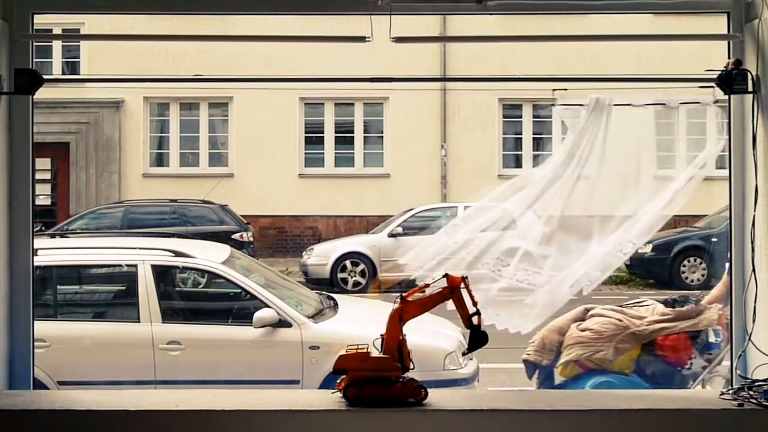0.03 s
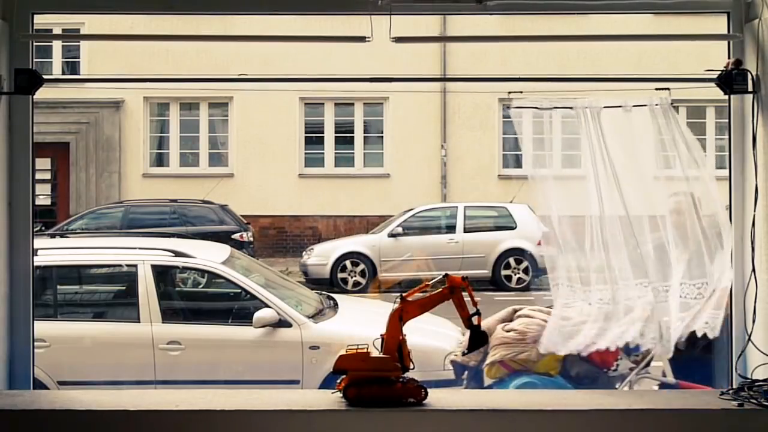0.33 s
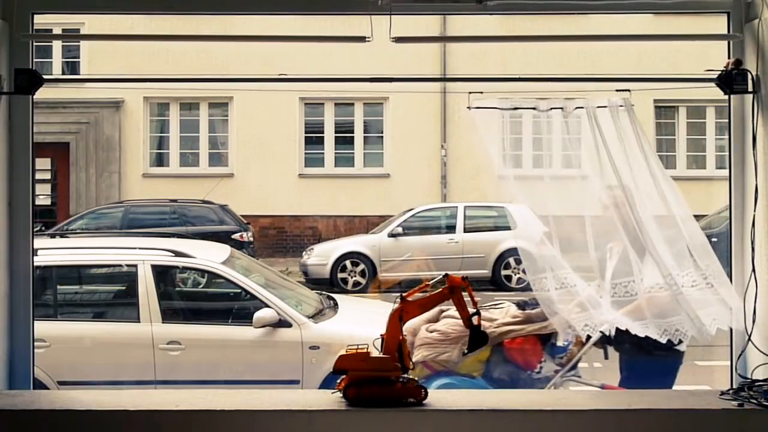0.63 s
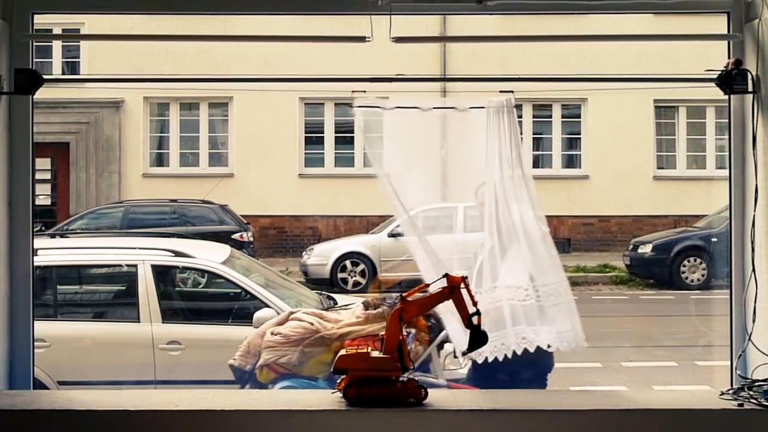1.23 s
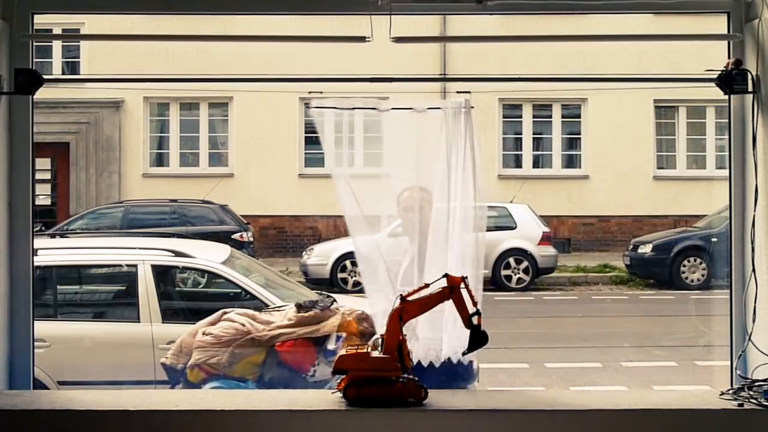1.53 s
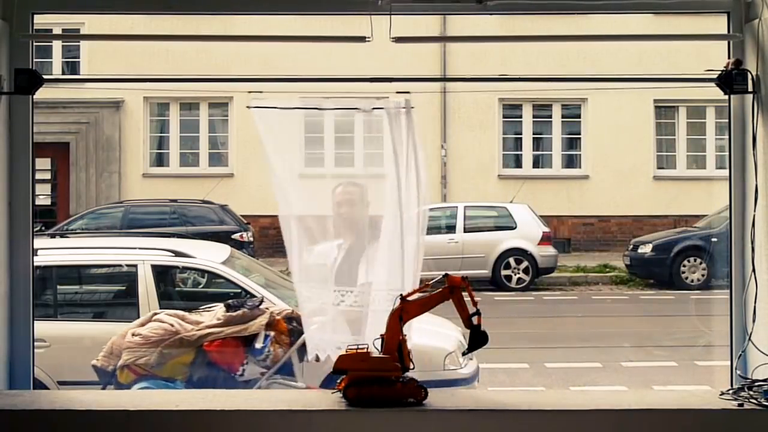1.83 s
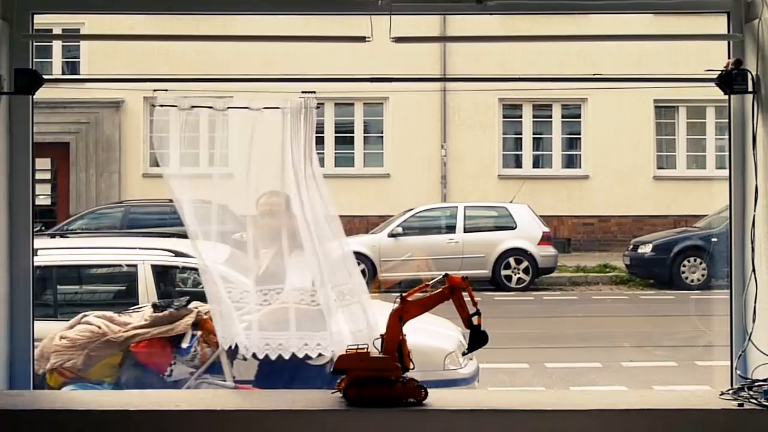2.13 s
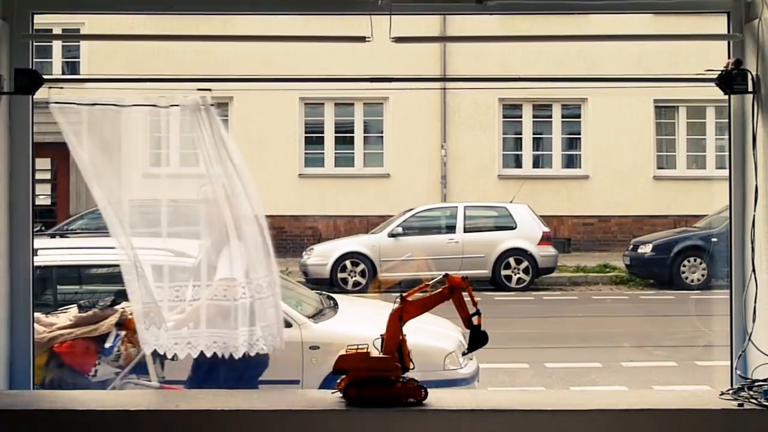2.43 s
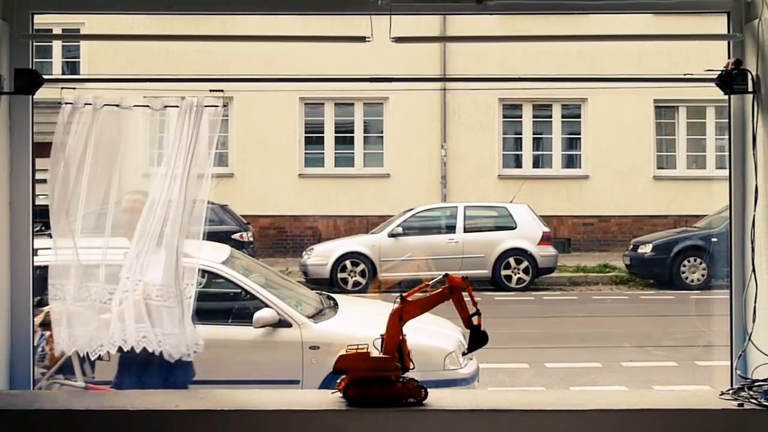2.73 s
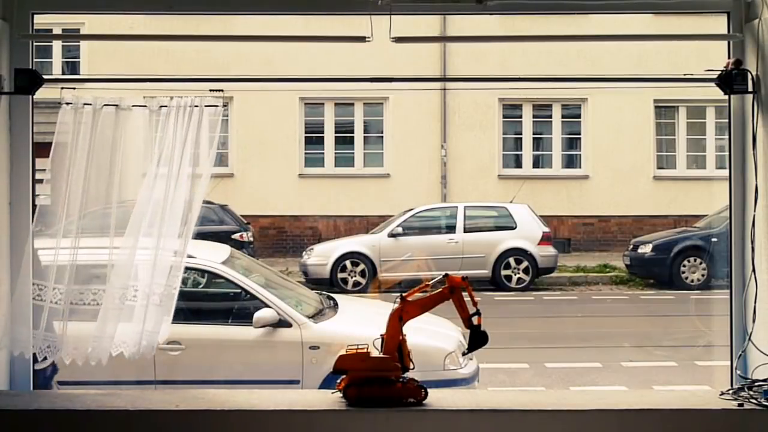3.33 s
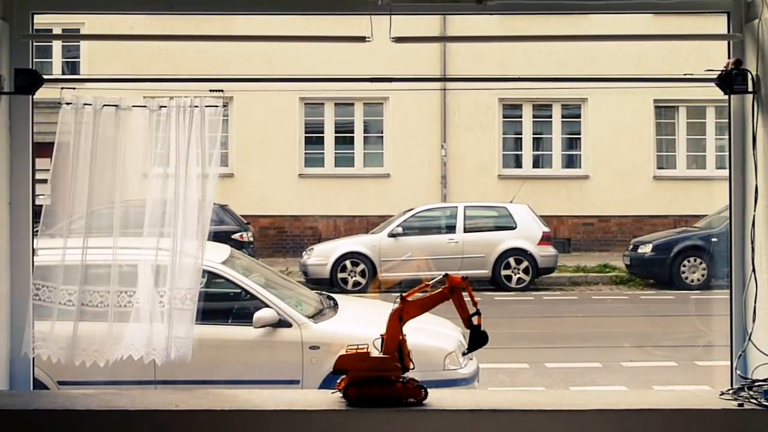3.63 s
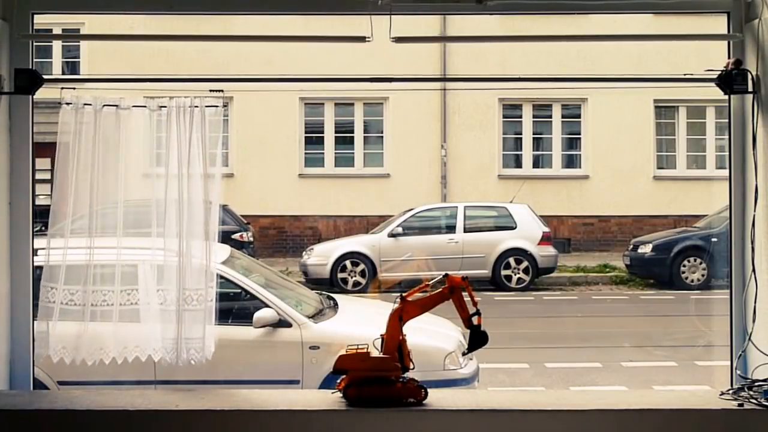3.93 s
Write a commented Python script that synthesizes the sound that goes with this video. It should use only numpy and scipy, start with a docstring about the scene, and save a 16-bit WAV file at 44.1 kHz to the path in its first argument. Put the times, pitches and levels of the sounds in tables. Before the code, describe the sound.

A small motor pulls a curtain along its line with a light, scratchy whirr. The line catches and squeaks on its pulleys, drags hardest near the end, then stops. A quiet street murmurs behind the window.

```python
"""A light, scratchy whirr: a small motor draws a curtain along its line beside a window, then stops.
The line rubs over its pulleys in countless tiny slips that ring the pulleys and their brackets;
it catches a few times, squeaks briefly and drags hardest near the end.
The room rings a little, and a quiet street murmurs behind the glass."""
import sys
import numpy as np
from scipy import signal
from scipy.fft import rfft, irfft, next_fast_len
from scipy.io import wavfile
from scipy.ndimage import map_coordinates

SR = 44100
rng = np.random.default_rng(int(sys.argv[2]) if len(sys.argv) > 2 else 0)


def log_audio(samples):
    """Write samples as a 16-bit WAV file to the path given in sys.argv[1]."""
    # one column per channel
    frames = np.atleast_2d(samples).T
    # limit to full scale, then quantise
    limited = np.clip(frames, -1, 1)
    pcm = np.round(limited * 32767).astype(np.int16)
    wavfile.write(sys.argv[1], SR, pcm)


N = 176400
TIME = np.arange(N) / SR


def from_db(db):
    """Turn decibels into a gain."""
    return 10 ** (np.asarray(db) / 20)


def unit_level(x):
    """Scale a signal so its average (rms) level is 1."""
    return x / np.sqrt(np.mean(x ** 2) + 1e-20)


def in_time(rows):
    """Join (time, value) rows by straight lines."""
    return np.interp(TIME, *np.transpose(rows))


def coloured(x, points):
    """Shape the bass and treble with a (Hz, dB) curve."""
    hz, db = np.transpose(points)
    bins = np.maximum(np.fft.rfftfreq(2 * N, 1 / SR), 1)
    gain = from_db(np.interp(np.log(bins), np.log(hz), db))
    return irfft(rfft(x, 2 * N) * gain)[:N]


def drift(hz):
    """A slow random wander, about 1 in size."""
    knots = rng.standard_normal(N // 40)
    return unit_level(map_coordinates(knots, [TIME * hz * 2], order=3, mode="wrap"))


def resonate(x, hz, width_hz):
    """Ring at one pitch; a narrower width rings longer."""
    r = np.exp(-np.pi * width_hz / SR)
    feedback = [1, -2 * r * np.cos(2 * np.pi * hz / SR), r * r]
    return signal.lfilter(np.array([1, 0, -1]) * (1 - r * r) / 2, feedback, x + 1e-18)


# tone of the traffic through the glass: f/Hz, level/dB
TRAFFIC_TONE = [(10, -23.5), (25, -18), (45, -12), (60, -13), (80, -7.5), (118, -6), (180, -4), (235, -6),
                (316, -5.5), (400, -5), (600, -7.5), (760, -6.5), (1050, -8.5), (1500, -11.5), (2500, -16),
                (4600, -22.5), (6900, -37.5), (9000, -65)]
# loudness of the traffic: t/s, level/dB
TRAFFIC_LEVEL = [(0, -51), (1.0, -52), (2.0, -52), (2.9, -52), (3.15, -53.5), (3.29, -52), (3.42, -54),
                 (3.6, -52), (3.8, -52.5), (3.95, -51), (4.0, -53)]
# low notes of the window pane: f/Hz, width/Hz, level/dB (against the traffic, halfway through)
PANE_NOTES = [(71.8, 9.1, -16.5), (219, 42, -16)]


def street(floor_db=-70.5):
    """Far traffic murmurs and sets the pane booming, over a faint even hiss."""
    traffic = unit_level(coloured(rng.standard_normal(N), TRAFFIC_TONE))
    boom = sum(from_db(db) * unit_level(resonate(traffic, hz, width)) for hz, width, db in PANE_NOTES)
    swell = from_db(6 * np.linspace(-1, 1, N))  # the boom grows by 12 dB
    hiss = from_db(floor_db) * rng.standard_normal(N)
    return (traffic + boom * swell) * from_db(in_time(TRAFFIC_LEVEL)) + hiss


def room(x, count=10, fade_s=0.41):
    """Echoes bounce between the walls, losing 60 dB in fade_s."""
    size = next_fast_len(N + SR)
    hz, response = np.fft.rfftfreq(size, 1 / SR), 0
    for k, delay_s in enumerate(rng.uniform(.009, .045, count)):
        echo = from_db(-60 * delay_s / fade_s) * np.exp(-2j * np.pi * hz * delay_s)
        response += (-1) ** k * echo / (1 - echo)  # one echo and all its repeats
    response /= np.sqrt(np.mean(np.abs(response) ** 2))
    return irfft(rfft(x, size) * response, size)[:N]


def slips(per_second=4500, spread_db=2.5):
    """The line sticks and slips, making a stream of tiny uneven clicks."""
    sizes = from_db(spread_db * np.minimum(rng.exponential(1, N), 4)) * rng.choice([-1, 1], N)
    return unit_level(sizes * (rng.random(N) < per_second / SR))


# a pulley or bracket sings briefly: t/s (at its loudest), length/s, f/Hz, level/dB
PULLEY_SQUEAKS = [(.01, 0.13, 685, -45), (0.015, .06, 840, -45.5), (.05, 0.061, 4730, -43.5),
                  (0.153, 0.065, 3090, -44), (0.453, 0.044, 2220, -45.5), (0.494, 0.08, 2370, -48),
                  (0.503, 0.043, 1100, -44.5), (0.625, 0.026, 2052, -40.5), (0.657, 0.03, 1092, -39),
                  (0.87, 0.22, 603, -56.5), (0.929, 0.066, 1132, -41), (1.0, .06, 2350, -54),
                  (1.124, 0.14, 1494, -43), (1.13, 0.2, 2973, -49), (1.16, 0.18, 3750, -52),
                  (1.504, 0.027, 2060, -52), (1.597, 0.032, 1060, -42.5), (1.786, 0.042, 2210, -49.5),
                  (2.034, 0.047, 802, -43.5), (2.05, 0.14, 2100, -39), (2.007, 0.13, 620, -48),
                  (2.438, 0.08, 635, -46), (2.556, 0.18, 599, -45.5), (2.67, 0.14, 2186, -56)]


def squeaks():
    """For a moment the slips feed one note, which swells and fades."""
    sound = 0
    for peak_s, length_s, hz, db in PULLEY_SQUEAKS:
        note = unit_level(resonate(slips(), hz, width_hz=25 + .012 * hz))
        swell = np.exp(-2 * ((TIME - peak_s) / length_s) ** 2)
        sound += note * from_db(db) * swell
    return sound


# the line catches and slips free: t/s, jerk level/dB, scrape level/dB
LINE_CATCHES = [(0.0, -31, -38), (.435, -45.5, -56), (0.606, -37.5, -54), (.648, -44, -61),
                (.752, -38.5, -45.5), (0.814, -42, -54), (1.05, -35.5, -53), (1.154, -37, -57),
                (1.585, -36, -50), (2.085, -35.5, -45)]


def catches(fade_s=0.28):
    """Each catch is a sudden force that dies away; gives the strength of the jerks and scrapes."""
    jerks = scrapes = 0
    for start_s, jerk_db, scrape_db in LINE_CATCHES:
        burst = (TIME >= start_s) * from_db(-60 * np.maximum(TIME - start_s, 0) / fade_s)
        jerks += from_db(jerk_db) * burst
        scrapes += from_db(scrape_db) * burst
    return jerks, scrapes


def whirr(hz=28, depth_db=0.5, wander=0.18):
    """The turning pulley presses unevenly on the line, so the level flutters."""
    turns = np.cumsum(hz * (1 + wander * drift(2.1))) / SR
    return from_db(depth_db * np.sin(2 * np.pi * turns))


# how hard the line rubs: t/s, level/dB
LINE_DRAG = [(0.0, -35.5), (0.25, -40.5), (0.36, -49.5), (0.49, -42), (0.59, -45), (0.62, -47), (0.67, -46),
             (0.68, -45), (0.74, -41.5), (1.17, -40), (1.36, -47.5), (1.52, -42), (1.57, -44.5),
             (1.59, -44), (1.63, -41), (1.64, -42.5), (1.68, -40.5), (1.74, -46.5), (1.92, -33.5),
             (2.1, -32.5), (2.19, -38.5), (2.21, -36), (2.29, -38), (2.46, -31.5), (2.57, -37.5),
             (2.8, -51)]
# notes of the pulleys and brackets: f/Hz, width/Hz, level/dB, growth/(dB per dB of drag)
PULLEY_NOTES = [(225, 36, -26, 2.04), (349, 50, -22.5, 0.93), (600.3, 13, -26.5, 2),
                (628.3, 19, -16.5, 1.5), (688, 23, -22, 2.27), (806, 13, -20, 1.06), (929, 11, -15.5, 1.34),
                (1006, 21, -11.5, 1.0), (1045.4, 30, -8, 1.27), (1120, 46, -5.5, 0.59),
                (1294.5, 47, -7.5, 1), (1486, 58, -8, 1.15), (1658, 19, -11, 1.14), (1775, 29, -18, 2.53),
                (1953, 10, -21.5, 2.18), (2037, 23, -19.5, 2.3), (2092, 13, -16, 0.9),
                (2130, 18, -9.5, 1.72), (2223, 18, -17, 1.8), (2251, 20, -10.5, 1.36), (2914, 18, -25, 1.3),
                (3153, 46, -14.5, 1.06), (3400, 33, -21.5, 1.63), (3658, 140, -16.5, 0.66),
                (4550, 97, -15, 1.04), (5250, 290, -24.5, 2.02)]
# tone of the rough rasp of the rubbing: f/Hz, level/dB
RASP_TONE = [(100, -39.5), (250, -7.5), (480, -9.5), (680, -8), (850, -3.5), (1100, 1), (1750, -2),
             (2300, -1.5), (2700, -6), (4000, -39), (12000, -58.5)]
# tone of the high hiss of the rubbing: f/Hz, level/dB
HISS_TONE = [(1500, -31), (2500, -3), (3300, 1), (4100, 0.5), (4900, -1.5), (5700, -7), (6700, -20),
             (9500, -17.5), (15500, -22)]
# loudness of that hiss: t/s, level/dB
HISS_LEVEL = [(0.0, -35.5), (0.25, -47.5), (0.37, -57.5), (0.5, -46), (0.59, -54), (0.61, -52.5),
              (0.72, -55), (0.76, -47), (1.02, -49), (1.06, -46.5), (1.18, -47), (1.29, -54.5), (1.44, -53),
              (1.5, -50.5), (1.54, -55), (1.62, -44), (1.75, -56.5), (1.86, -42.5), (1.95, -37),
              (2.05, -38), (2.07, -37), (2.22, -46.5), (2.44, -36.5), (2.8, -59.5)]


def curtain_line(usual_db=-40, ring_db=-2.5, rasp_db=-4.5, hiss_db=-0.5, stop_s=2.76):
    """The line's slips ring the pulleys, rasp and hiss; hard drag lifts some notes more than others."""
    running = from_db(-88 * np.maximum(TIME - stop_s, 0)) * whirr()  # stopping: 88 dB quieter a second
    extra_drag_db = in_time(LINE_DRAG) - usual_db
    jerks, scrapes = catches()
    rings = 0
    for hz, width_hz, db, growth in PULLEY_NOTES:
        flicker_db = 1.5 * drift(6)
        rubbing = from_db(usual_db + growth * extra_drag_db + flicker_db)
        force = np.hypot(rubbing, jerks)  # adds their powers
        width_gain = np.sqrt(SR / (np.pi * width_hz))  # keeps narrow notes as strong as wide ones
        rings += from_db(ring_db + db) * width_gain * resonate(slips() * running * force, hz, width_hz)
    rasp_gain = from_db(rasp_db + usual_db + 1.043 * extra_drag_db)
    rasp = unit_level(coloured(slips(), RASP_TONE)) * rasp_gain
    hiss_gain = np.hypot(from_db(hiss_db + in_time(HISS_LEVEL)), scrapes)
    hiss = unit_level(coloured(slips(), HISS_TONE)) * hiss_gain
    return rings + running * (rasp + hiss)


def scene(echo_db=-11.5):
    """The moving curtain in its room, with the street behind."""
    curtain = curtain_line() + squeaks()
    echo_gain = from_db(echo_db)
    indoors = (curtain + echo_gain * room(curtain)) / np.hypot(1, echo_gain)
    return (indoors + street())[None]


# the microphone's dull treble: f/Hz, level/dB
MICROPHONE_TONE = [(6500, -1), (7100, -9), (7700, -28), (8200, -33.5), (8800, -19), (9600, -15.5),
                   (10500, -20.5), (11300, -32.5), (15500, -27)]


def record(dry, cutoff_hz=16250):
    """The microphone dulls the treble, and the very top is cut away."""
    dulled = coloured(dry[0], MICROPHONE_TONE)
    low_pass = signal.cheby2(16, 60, cutoff_hz, fs=SR, output="sos")
    return signal.sosfilt(low_pass, dulled)[None]


dry = scene()
out = record(dry)
log_audio(out)
```